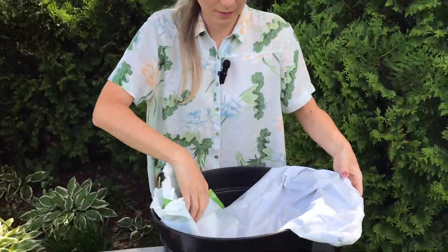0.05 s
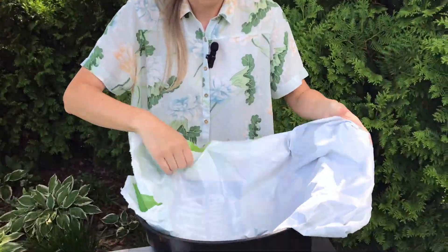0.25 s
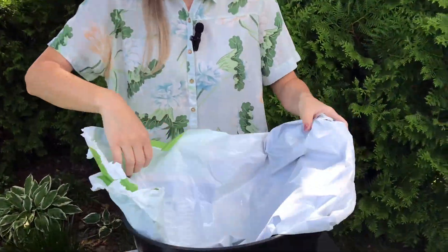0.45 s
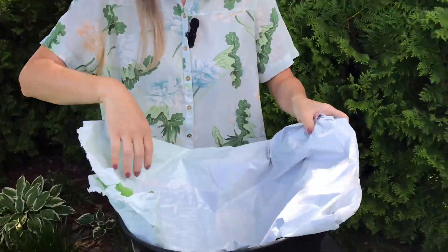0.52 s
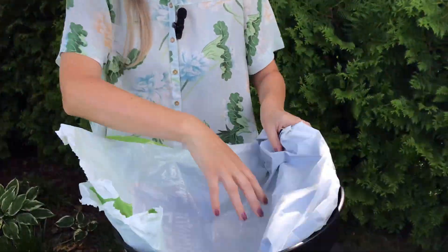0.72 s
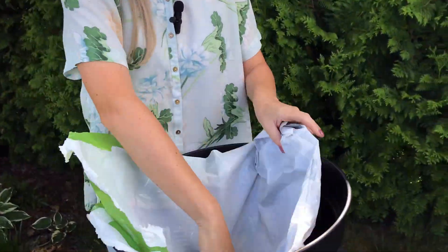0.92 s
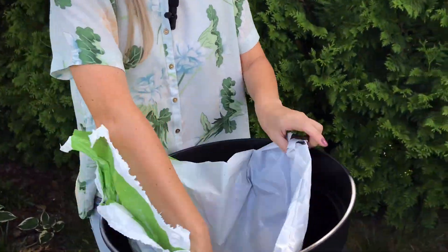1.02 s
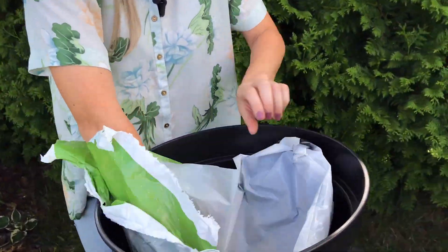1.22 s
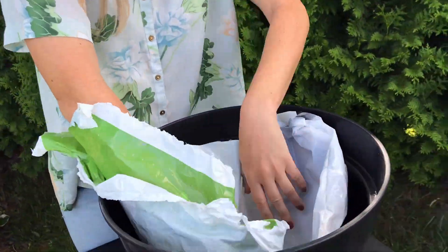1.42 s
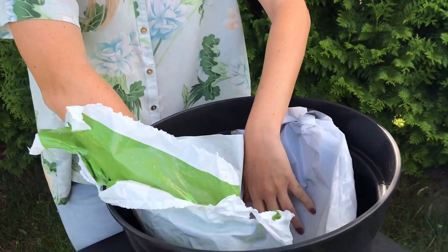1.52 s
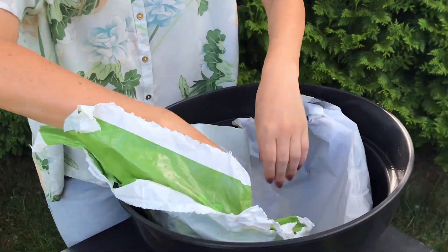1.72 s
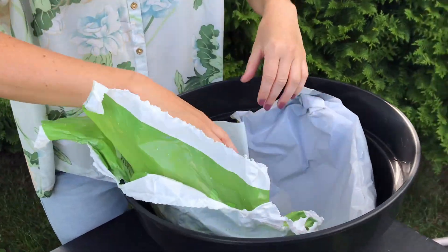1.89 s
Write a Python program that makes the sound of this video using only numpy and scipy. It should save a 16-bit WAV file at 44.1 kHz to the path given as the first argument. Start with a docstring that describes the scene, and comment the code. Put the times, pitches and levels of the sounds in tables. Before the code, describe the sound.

Stiff plastic sheeting rustles and crackles as hands press it into a large planter.

```python
"""Two hands press a stiff plastic sheet down into a large planter, outdoors and close by.
From the first push, tiny creases buckle, larger folds snap one by one and slack film flaps and pops.
Early on the sheet billows, and at 0.3 s fingers squeak on it. Push follows push while the hollow
planter rings underneath, more so from about 1.4 s, as the hands reach the bottom.
At 1.7 s the sheet settles with a few faint scuffs, leaving still garden air."""
import sys
import numpy as np
from scipy import signal
from scipy.io import wavfile
from scipy.ndimage import uniform_filter1d

SR = 44100
rng = np.random.default_rng(int(sys.argv[2]) if len(sys.argv) > 2 else 0)


def wav_out(sig):
    """Save sig, one row per channel (or a flat mono array), as 16-bit PCM at SR to the path in sys.argv[1]."""
    wavfile.write(sys.argv[1], SR, np.round(np.clip(np.atleast_2d(sig).T, -1, 1) * 32767).astype(np.int16))


N = 85995
T = np.arange(N) / SR
SHORT = T[:2048]  # time axis for one brief sound


def amp(db):
    """Turns decibels into a number to multiply by."""
    return 10 ** (np.asarray(db) / 20)


def unit(x):
    """Scales a sound to an average (rms) strength of 1."""
    return x / np.sqrt(np.mean(x ** 2) + 1e-20)


def add(mix, start_s, sound):
    """Mixes a sound in at the given time."""
    part = mix[round(start_s * SR):][:len(sound)]
    part += sound[:len(part)]


def through(x, response):
    """Gives every sample a tail shaped like the response, scaled to energy 1."""
    return signal.oaconvolve(x, response / np.linalg.norm(response))[:len(x)]


def colour(x, points):
    """Makes some frequencies louder and others softer, following a tone table."""
    hz, db = np.transpose(points)
    freqs = abs(np.fft.fftfreq(4096, 1 / SR))
    log_gain = np.log(amp(np.interp(np.log(freqs + 1), np.log(hz), db)))
    spectrum = np.exp(np.conj(signal.hilbert(log_gain)))  # so nothing sounds before its cause
    return through(x, np.fft.ifft(spectrum).real[:len(SHORT)])


def burst(decay_s, t):
    """Noise that dies away."""
    return rng.choice([-1., 1.], len(t)) * np.exp(-t / decay_s)


def ringing(x, notes, fade_s):
    """A hollow rings at its own notes, falling 60 dB in fade_s."""
    decay = np.exp(-np.log(1000) * T / fade_s)
    tones = sum(amp(db) * np.cos(2 * np.pi * hz * T) for hz, db in notes)
    return signal.fftconvolve(x, 2 * tones * decay / decay.sum())[:N]


# tone of the outdoor air (frequency [Hz], relative level [dB])
AIR_TONE = [(20, 4), (65, -7), (130, -7), (400, -3.5), (630, -7), (950, -14), (1500, -9.5), (3000, -16.5),
            (7000, -14), (13000, -22), (16000, -29.5)]
def garden_air():
    """Still air makes a very faint, steady hush."""
    return amp(-86) * unit(colour(rng.standard_normal(N), AIR_TONE))


def hedge_echo(x, fade_s=0.11):
    """A little of the sound bounces back from the hedge."""
    return amp(-16.5) * through(x, burst(fade_s / np.log(1000), T))


# strength of the gusts (time [s], level [dB])
GUST_LEVELS = [(.07, -100), (.14, -65), (.225, -51), (.29, -71), (.335, -71), (.405, -72.5), (.45, -72),
               (.54, -65), (.64, -72), (.73, -69), (.8, -92), (.87, -71), (.94, -77.5), (1.0, -74.5),
               (1.065, -67), (1.12, -100), (1.55, -100), (1.665, -81), (1.76, -100)]
# their tone (frequency [Hz], relative level [dB])
GUST_TONE = [(25, -24), (50, -16), (90, -1.5), (108, -2), (135, -12.5), (180, 1), (300, -23)]
def billow():
    """The loose sheet pushes air in soft, low gusts."""
    gusts = unit(colour(rng.standard_normal(N), GUST_TONE))
    return gusts * amp(np.interp(T, *np.transpose(GUST_LEVELS)))


# notes of the planter (pitch [Hz], gain [dB])
PLANTER_NOTES = [(244, -4), (282, -9), (532, -10), (660, -13.5), (742, -14), (1165, -17.5), (1505, -18),
                 (2260, -12.5)]
def planter_ring(x):
    """The planter's air and walls ring briefly, all notes dying at one rate."""
    return ringing(x, PLANTER_NOTES, fade_s=.14)


# notes of the air pocket (pitch [Hz], gain [dB])
POCKET_NOTES = [(625, -3), (727, -5), (960, -12), (1070, -12), (2225, -9), (2350, -10), (2610, -10)]
def pocket_ring(x):
    """The air under the sheet rings once the sheet lies at the bottom."""
    return ringing(x, POCKET_NOTES, fade_s=.22)


def soften_band(x, dip_hz=1830, share=.65):
    """Makes one narrow band of the rustle and snaps, near 1830 Hz, softer."""
    notched = signal.lfilter(*signal.iirnotch(dip_hz, Q=7, fs=SR), x)
    return x + share * (notched - x)


# tone deep in the planter (frequency [Hz], relative level [dB])
DEEP_TONE = [(150, -7.5), (260, -8), (420, -5), (640, 2.5), (800, -5), (1070, -0.5), (1270, -16),
             (1540, -2), (1820, -4), (2290, 3), (2480, -3.5), (2660, 1.5), (2900, 1), (3450, -0.5),
             (3750, 0.5), (4200, 1), (5200, -0.5), (6300, -2.5), (8500, -2.5), (11000, 0), (14500, 5.5),
             (16000, -0.5)]
def deep_walls(x):
    """Near the bottom, the planter's walls change the tone of the sheet."""
    return amp(0.5) * colour(x, DEEP_TONE)


# the last scuffs (time [s], length [s], level [dB])
SCUFFS = [(1.707, 0.024, -60), (1.743, 0.011, -54), (1.748, 0.048, -66.5)]
# their tone (frequency [Hz], relative level [dB])
SCUFF_TONE = [(400, -17), (560, -8), (640, 13), (730, -2), (1000, -22), (1900, -26), (2150, -19),
              (2330, 0.5), (2550, -15.5), (2800, -14), (3450, 0), (4250, -7), (5000, -31), (6100, -8),
              (7400, -20.5), (9000, -32), (12500, -33), (14500, -9), (16000, -14)]
def settling():
    """The film slides back a little, in faint short scuffs."""
    level = sum(amp(db) * np.sin(np.pi * np.clip((T - s) / length, 0, 1)) for s, length, db in SCUFFS)
    return level * unit(colour(rng.standard_normal(N), SCUFF_TONE))


# fingers on the film (time [s], length [s], pitch [Hz], level [dB])
FINGER_SQUEAKS = [(0.295, 0.011, 5780, -40.5), (0.303, 0.015, 6930, -41)]
def squeaks(jitter=.045):
    """A fingertip sticks and slips, very fast and unevenly."""
    out = np.zeros(N)
    for s, length, hz, db in FINGER_SQUEAKS:
        wobble = unit(uniform_filter1d(rng.standard_normal(len(SHORT)), 16))
        pitch_hz = hz * (1 + jitter * wobble)
        swell = np.sin(np.pi * np.minimum(SHORT / length, 1))
        add(out, s, amp(db) * swell * np.sin(2 * np.pi * np.cumsum(pitch_hz) / SR))
    return out


# panels of film popping through (time [s], pitch [Hz], level [dB])
PANEL_POPS = [(.176, 750, -36.5), (.247, 524, -34), (.319, 349, -37), (.502, 334, -47), (.964, 620, -32.5),
              (1.297, 713, -33.5), (1.649, 616, -32)]
def pops(swell_s=0.0033):
    """A slack panel flips over with a short, hollow note."""
    out = np.zeros(N)
    swell = (SHORT / swell_s * np.exp(1 - SHORT / swell_s)) ** 2
    for s, hz, db in PANEL_POPS:
        add(out, s, amp(db) * swell * np.sin(2 * np.pi * hz * SHORT))
    return out


def patch_ring(hz, cycles, rise_s=.0001):
    """A flat patch of film flips and rings for a moment; it is too small to give off bass."""
    motion = np.sin(2 * np.pi * hz * SHORT) * np.exp(-SHORT * hz / cycles)
    motion *= 1 - np.exp(-SHORT / rise_s)
    return np.diff(motion, prepend=0) * SR / (2 * np.pi * hz)


def creases(per_s=3200, low_hz=844, high_hz=8520, pitches=28):
    """Tiny creases buckle at random; returns their rings and their dry ticks, each over a sliding hiss."""
    rings, ticks = np.zeros(N), np.zeros(N)
    for hz in np.linspace(low_hz, high_hz, pitches):
        at = np.flatnonzero(rng.random(N) < per_s / pitches / SR)
        flips = np.zeros(N)
        flips[at] = rng.choice([-1, 1], N)[at]
        flips[at] *= amp(4.6 * np.minimum(rng.exponential(1, N)[at], 2.7))  # many small, a few big
        flips += amp(-2.5) * through(flips, burst(0.0053, SHORT))  # nearby folds blur each flip
        rings += through(flips, patch_ring(hz, cycles=1.1))
        ticks += through(flips, burst(.0004, SHORT))
    slide = amp(-6) * rng.standard_normal(N)
    return unit(rings) + slide, unit(ticks) + slide


# strength of each layer as the hands push (time [s], crinkle [dB], fizz [dB], hollow [dB], flap [dB])
PUSHES = [(0.05, -93, -105, -91, -100), (0.1, -52, -62, -72, -69.5), (0.131, -35, -43.5, -55, -47),
          (0.18, -35.5, -41.5, -39.5, -41), (0.225, -42.5, -48, -53, -49.5), (0.255, -44.5, -52, -40, -48),
          (0.289, -52, -48, -68.5, -64), (0.331, -44.5, -48, -44.5, -50), (0.409, -51.5, -63, -57.5, -60),
          (0.463, -41, -51, -48.5, -54.5), (0.53, -44, -48.5, -52, -47), (0.57, -52, -57, -60.5, -59.5),
          (0.665, -47, -56.5, -55, -61.5), (0.7, -49, -57, -52, -54.5), (0.79, -51, -64, -59, -62),
          (0.831, -50, -60, -66, -58), (0.86, -37.5, -52.5, -40, -47), (0.928, -49.5, -51.5, -58, -58),
          (0.97, -41, -54, -36, -49), (0.998, -34, -50, -41, -44.5), (1.038, -42, -52, -52, -55.5),
          (1.064, -42.5, -38.5, -40, -47.5), (1.099, -43.5, -56, -45, -54.5),
          (1.145, -49, -55.5, -51, -61.5), (1.25, -42, -54.5, -47, -66), (1.295, -38, -44, -41.5, -52.5),
          (1.346, -48, -69.5, -54.5, -66), (1.379, -45.5, -40, -46, -83), (1.43, -49, -72.5, -54, -57.5),
          (1.465, -50, -56.5, -45.5, -54.5), (1.503, -60.5, -65.5, -75, -92.5),
          (1.551, -46, -54, -47.5, -52), (1.616, -52, -59.5, -53, -70), (1.651, -36.5, -45.5, -38.5, -43),
          (1.701, -57, -66, -52.5, -61), (1.772, -88.5, -81, -79, -87), (1.82, -87.5, -83, -84, -99.5)]
# tones of those four layers (frequency [Hz], relative level [dB])
CRINKLE_TONE = [(500, -17.5), (850, -12.5), (1170, -4.5), (1380, -2), (1540, 4), (1800, 6.5), (2280, 3.5),
                (2620, 1), (3100, -0.5), (4600, -0.5), (6800, -4.5), (8400, -15), (10000, -43.5),
                (16000, -24)]
FIZZ_TONE = [(4000, -60), (7500, 12.5), (9000, 7), (10300, 3.5), (12500, 7.5), (14800, 6.5), (16000, 8.5)]
HOLLOW_TONE = [(150, -62.5), (260, -31), (400, -11.5), (520, 1.5), (750, 3.5), (870, -8), (1050, -4.5),
               (1350, -12.5), (2400, -13.5), (6000, -51)]
FLAP_TONE = [(25, -48.5), (60, -33), (90, -30), (130, -26), (200, -11), (238, 1), (310, -0.5), (420, 0),
             (600, -12.5), (900, -37), (1200, -27.5), (1700, -14), (3000, -52)]
def rustle(fade_db_per_s=129):
    """The creases follow the hands: crinkle, high fizz, the hollow below and slack film flapping."""
    times, crinkle, fizz, hollow, flap = np.transpose(PUSHES)
    rings, ticks = creases()
    layers = [(rings, CRINKLE_TONE, crinkle + 0.5), (ticks, FIZZ_TONE, fizz - 2),
              (ticks, HOLLOW_TONE, hollow - 2), (ticks, FLAP_TONE, flap - 1.5)]
    swarm = sum(unit(colour(x, tone)) * amp(np.interp(T, times, db)) for x, tone, db in layers)
    still_s = abs(T - np.clip(T, times[0], times[-1]))  # time before the first push or after the last
    return swarm * amp(-fade_db_per_s * still_s)


# folds that snap (time [s], level [dB], pitch [Hz], extra crack [dB], extra knock [dB])
FOLD_SNAPS = [(0.085,-41,2850,1,-20), (0.1172,-32,2740,2,4), (.127,-28,2330,10,14), (0.1412,-20.5,2530,2,3),
              (.1508,-18.5,4150,-7,-12), (.1658,-21,3760,4,-2), (.1795,-23,2700,5,14),
              (.1867,-36,2260,13,17), (0.1989,-39,2740,19.5,1), (0.2206,-28.5,5000,7.5,4),
              (0.2428,-21,5240,-14,1), (0.252,-29,4200,7.5,-9), (.3236,-30.5,4460,10.5,11.5),
              (0.3378,-19.5,2100,-2,-19), (.352,-33,2630,1,-3), (.373,-30,2500,4,12),
              (0.4373,-27,2370,-13,11), (0.4625,-21.5,3900,-5.5,4), (0.4796,-23.5,2570,9.5,-15),
              (0.4882,-28.5,3770,7,-18), (.5088,-20,2250,-2.5,3), (0.5277,-20,1850,2,-10),
              (0.544,-25.5,3700,-1,3), (0.618,-42.5,3520,18,-4), (0.6399,-25,1860,-4.5,-25),
              (0.6565,-24,4060,0.5,6.5), (.665,-25,2280,-4,-10), (.724,-23,3500,7,6),
              (0.764,-31.5,2520,6,-23), (0.7998,-25.5,4700,-1,-5), (0.859,-23.5,2570,8.5,-2),
              (.866,-18.5,2310,-13,-14), (0.8996,-29,5000,10,8), (.9492,-23.5,2280,-15,4),
              (.9617,-25,2270,-17,10), (0.968,-26,3540,-14,3), (0.984,-21,2160,0,7), (.9925,-21.5,3930,0,0),
              (0.9952,-11.5,6170,-11,-8), (1.0155,-25.5,1500,5,22.5), (1.0245,-21,4470,-12,10),
              (1.0498,-16,6760,-6,-1), (1.0543,-15.5,4600,1.5,3.5), (1.0631,-22.5,2410,9,-6),
              (1.0659,-23,2580,6,10), (1.0708,-24,2630,5.5,16.5), (1.0983,-28.5,3800,-2,8.5),
              (1.1572,-15.5,3080,-6.5,-6), (1.1759,-27,2560,6.5,-7), (1.1822,-9.5,3720,-6.5,-15.5),
              (1.1985,-20,6280,-9,5.5), (1.2204,-28.5,2250,6.5,8.5), (1.2422,-13,4930,-7.5,-15),
              (1.257,-25,2930,5,-10), (1.2717,-17.5,2400,2,-13), (1.29,-16,5810,-9,-3),
              (1.2978,-18.5,3780,-14,3), (1.3168,-22,3350,-3,-2.5), (1.3236,-24,3800,-11.5,-2.5),
              (1.3323,-19,3660,-7.5,-3), (1.3643,-14,5360,-24,-36), (1.371,-23,5000,3,8.5),
              (1.3774,-22.5,6980,9,11), (1.3899,-21,4000,-1.5,1.5), (1.4081,-20.5,3280,-6,10.5),
              (1.4125,-27,3450,-8,-2), (1.4172,-25,3050,6.5,13.5), (1.439,-25,2220,-12,-4),
              (1.4533,-17.5,3460,4.5,7), (1.5288,-25.5,2560,8.5,-2.5), (1.555,-24,6960,-2.5,4),
              (1.5588,-18.5,6650,-7.5,-5.5), (1.578,-29,2840,-1,-6), (1.6349,-27.5,3630,2,-1),
              (1.673,-23.5,4010,-5,-0.5)]
# tone of the crack (frequency [Hz], relative level [dB])
CRACK_TONE = [(120, -43.5), (300, -13.5), (1200, 2.5), (2400, 7.5), (6500, 3.5), (10000, -11),
              (14500, -8.5), (16000, -16)]
def snaps(rise_s=0.00015, crack_s=0.0018, scatter_s=0.0032):
    """Each large fold clicks, cracks, rings and knocks the planter's air; nearby folds scatter the sound."""
    out = np.zeros(N)
    click = signal.unit_impulse(len(SHORT))
    rise = 1 - np.exp(-SHORT / rise_s)
    for s, db, hz, crack_db, knock_db in FOLD_SNAPS:
        ring = amp(-3) * patch_ring(hz, cycles=1.9)
        raw_crack = amp(6.5) * click + rise * burst(crack_s, SHORT)
        crack = amp(crack_db - 10.5) * colour(raw_crack, CRACK_TONE)
        knock = amp(knock_db - 7) * colour(click, HOLLOW_TONE)
        snap = ring + crack + knock
        scatter = burst(scatter_s, SHORT) * (1 - np.exp(-SHORT / crack_s))
        add(out, s, amp(db) * (snap + amp(-5) * through(snap, scatter)))
    return out


def scene(deep_from_s=1.38, deep_by_s=1.52):
    """The sheet sinks into the ringing planter, in a quiet garden."""
    sheet = soften_band(rustle() + snaps()) + pops() + squeaks()
    depth = np.clip((T - deep_from_s) / (deep_by_s - deep_from_s), 0, 1)  # 1 at the bottom
    deep = deep_walls(depth * sheet) + settling()
    sheet = (1 - depth) * sheet + deep
    near = sheet + planter_ring(sheet) + pocket_ring(deep) + billow()
    return (near + hedge_echo(near) + garden_air())[None]


def record(dry, cutoff_hz=15780):
    """Removes the very highest treble."""
    low_pass = signal.firwin(401, cutoff_hz, window=("kaiser", 8), fs=SR)
    return signal.oaconvolve(dry, low_pass[None], "same")


dry = scene()
out = record(dry)
wav_out(out)
```